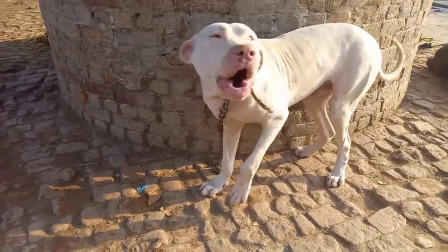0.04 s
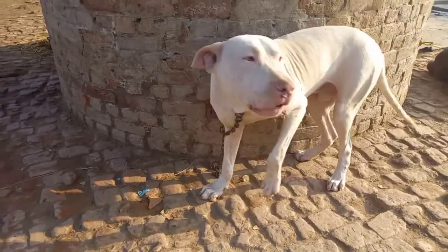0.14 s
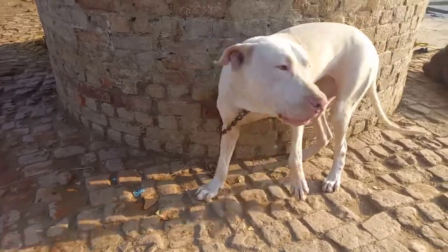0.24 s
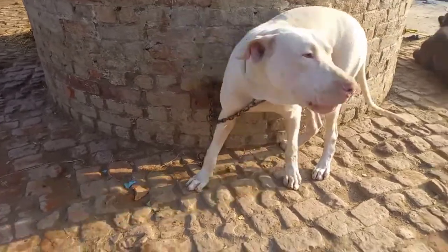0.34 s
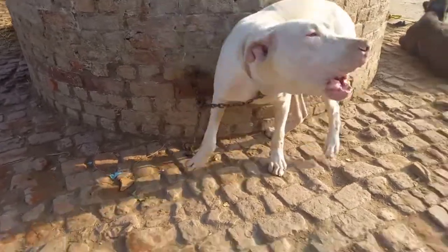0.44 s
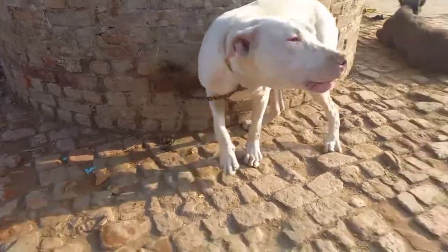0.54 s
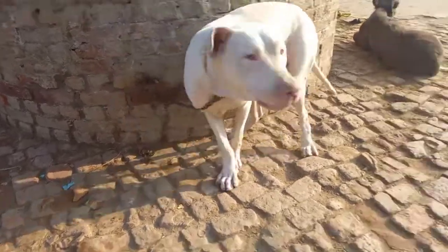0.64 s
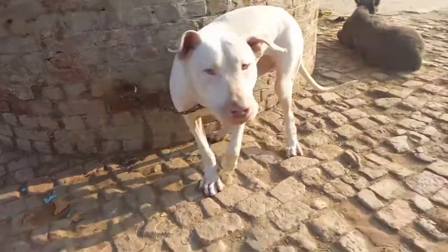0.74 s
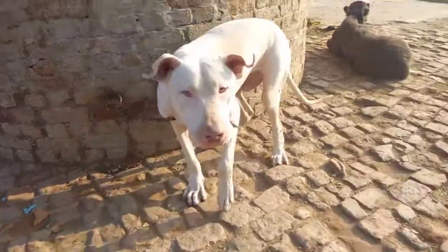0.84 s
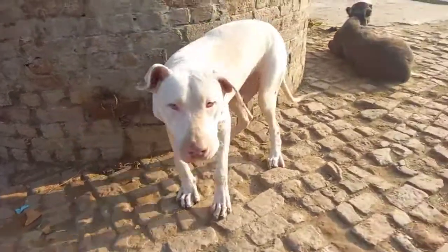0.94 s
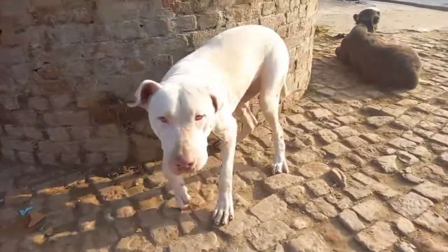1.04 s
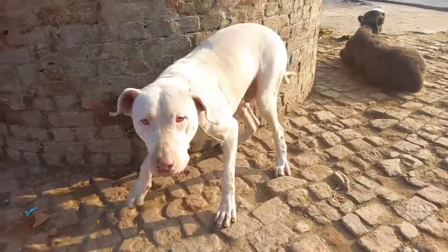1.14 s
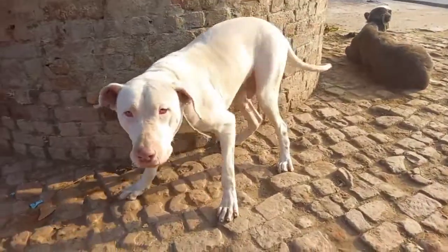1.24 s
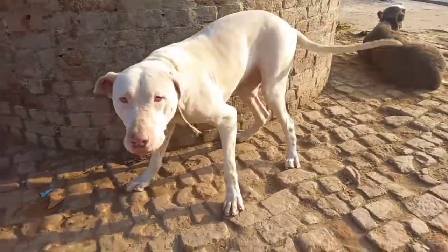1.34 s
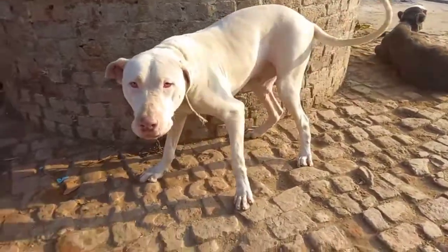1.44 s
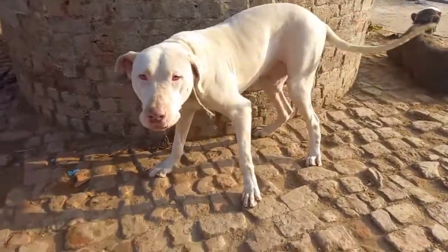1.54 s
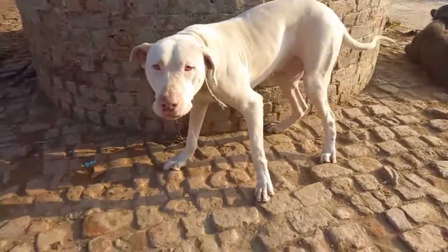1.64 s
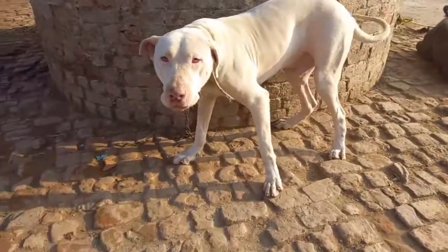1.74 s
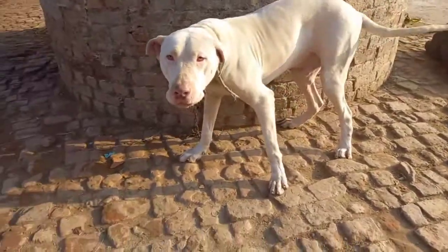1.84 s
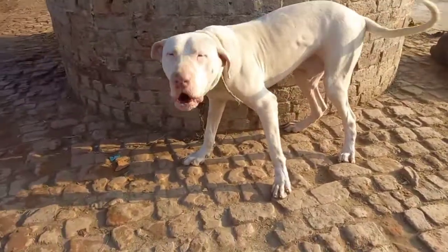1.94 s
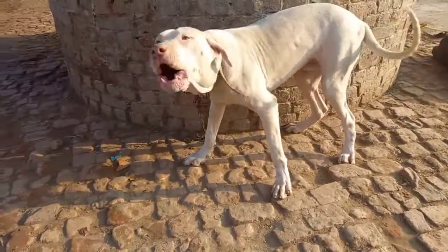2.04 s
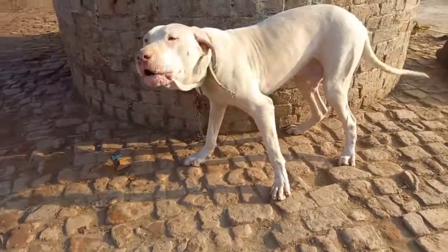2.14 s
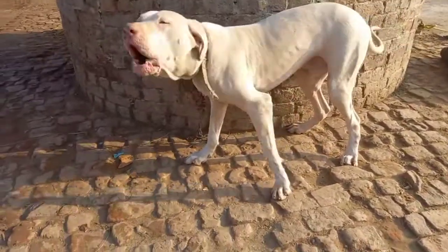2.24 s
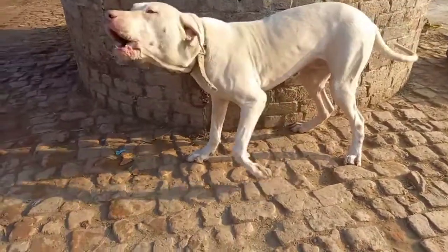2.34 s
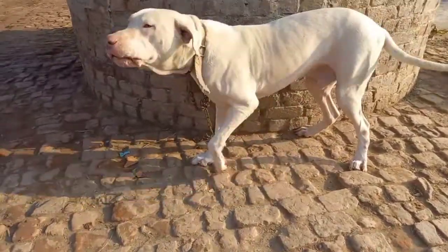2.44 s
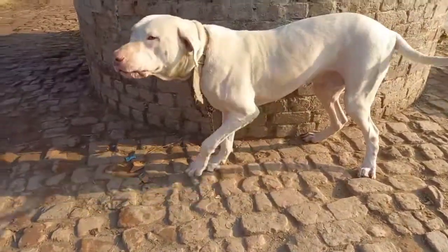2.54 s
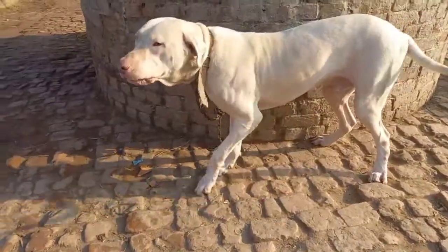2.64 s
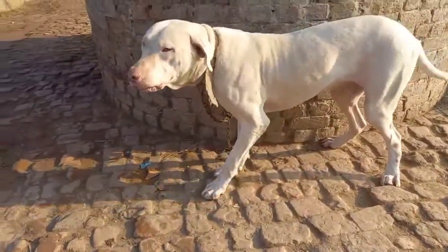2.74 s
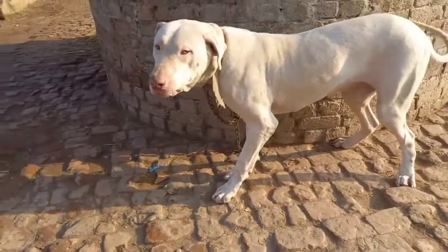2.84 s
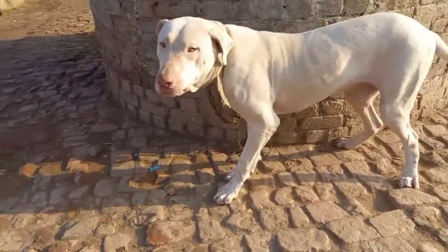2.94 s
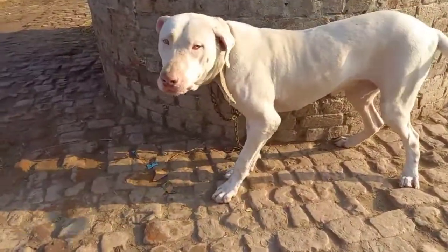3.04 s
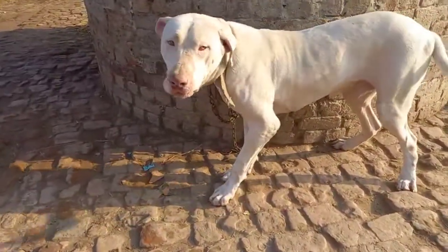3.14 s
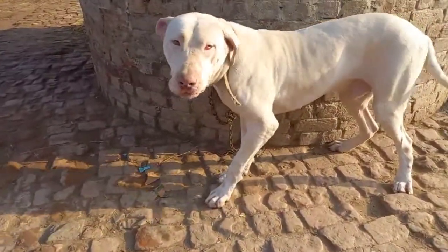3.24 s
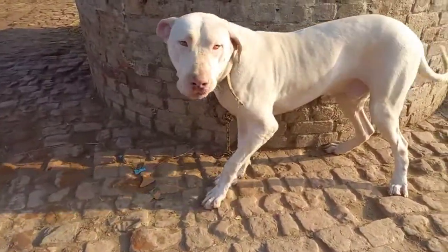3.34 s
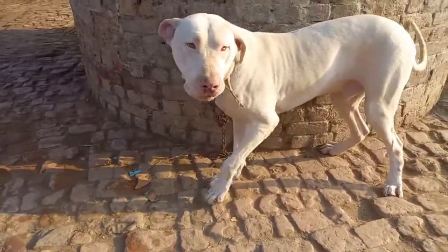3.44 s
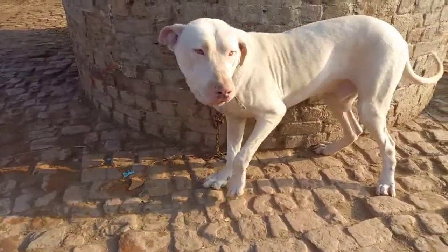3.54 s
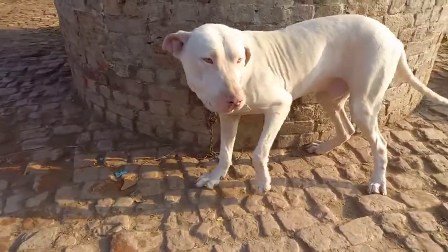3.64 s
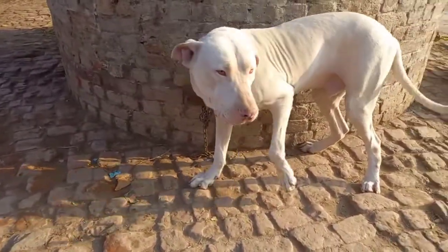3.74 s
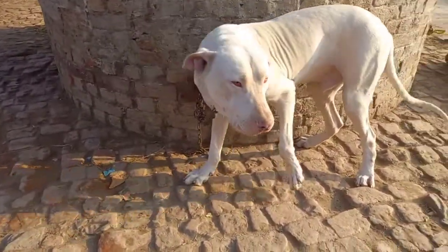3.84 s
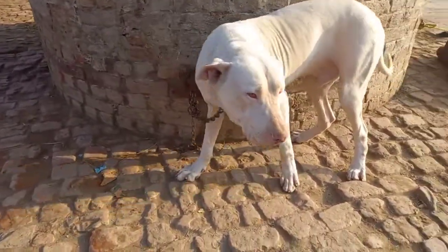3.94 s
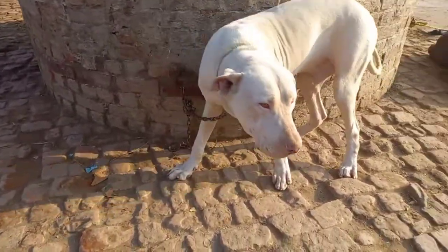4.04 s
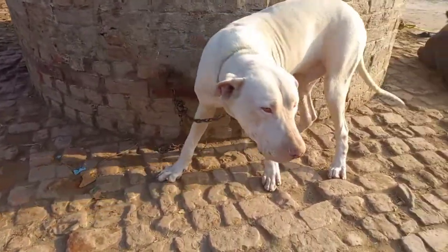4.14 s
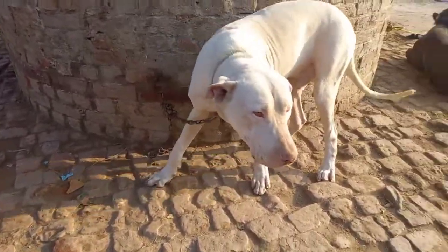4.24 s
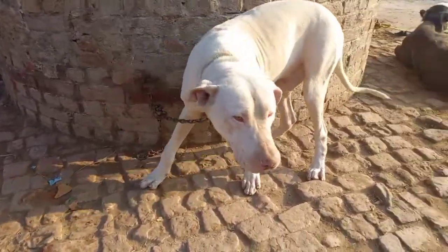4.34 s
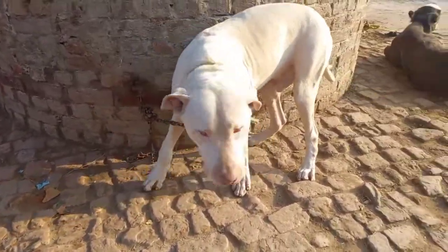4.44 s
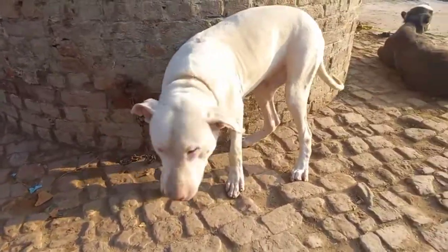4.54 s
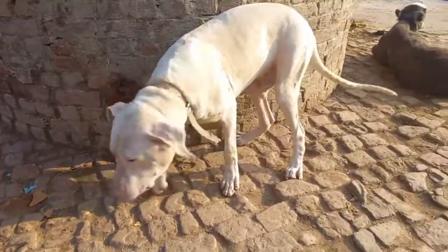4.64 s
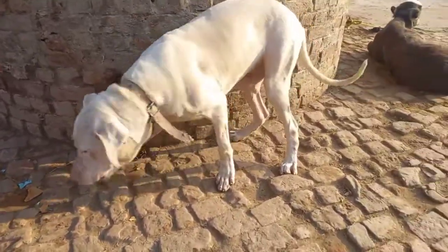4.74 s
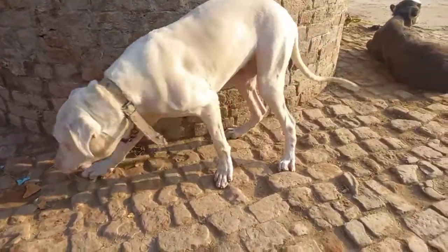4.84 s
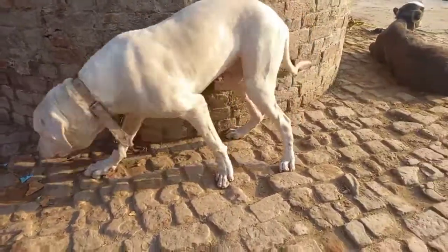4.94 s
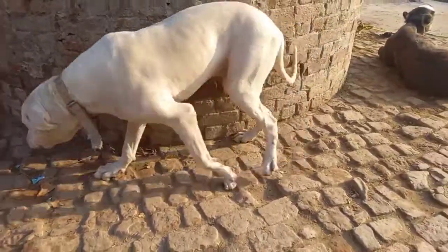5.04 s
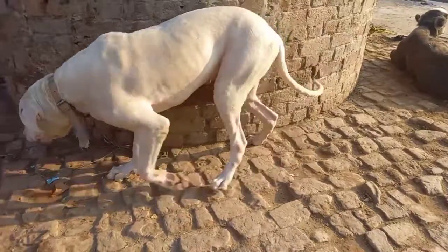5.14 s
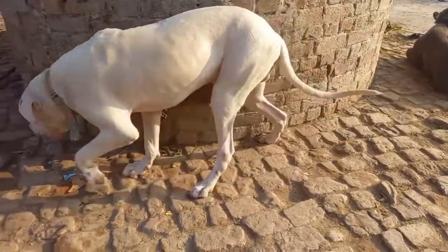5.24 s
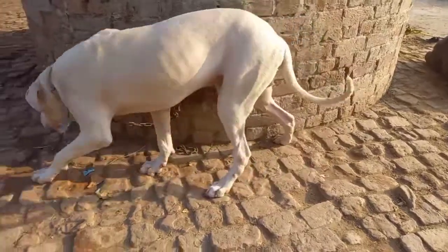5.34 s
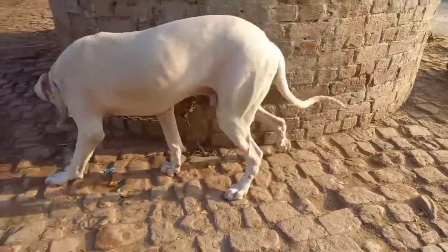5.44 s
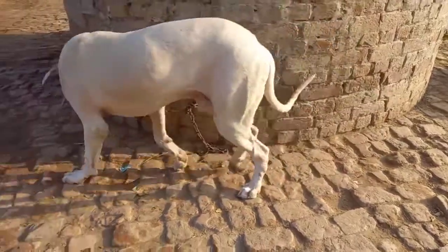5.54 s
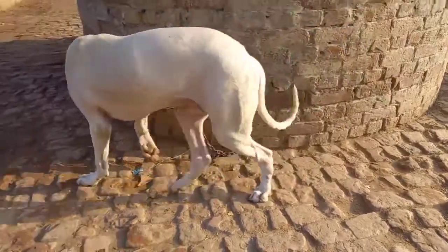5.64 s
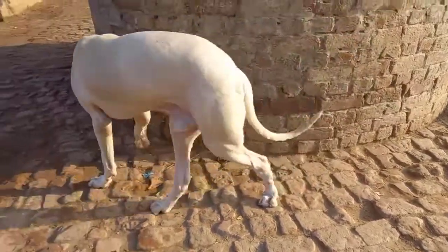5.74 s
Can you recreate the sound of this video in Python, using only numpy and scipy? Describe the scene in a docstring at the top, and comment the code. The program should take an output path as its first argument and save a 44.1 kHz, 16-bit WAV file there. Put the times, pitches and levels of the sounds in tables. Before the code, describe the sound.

A big chained dog gives two hoarse double barks in a brick yard, then grumbles into a long, low, throbbing growl with chain clinks.

```python
"""A brick yard, close to a big chained dog: two hoarse double barks, each bark one gesture of push, pitch and jaw.
Noisy vocal folds ring the throat, and a noise tail from the walls answers. Paws pat and scuff the paving.
A fluttering grumble leads into a growl: bursts of slaps as slow throbs, brief snarls, then a steady low pulse train.
The chain is fine noise and ringing metal; behind lie a faint hum and a low rumble that swells mostly with the barks."""
import sys
import numpy as np
from scipy import signal
from scipy.fft import rfft, irfft, next_fast_len
from scipy.io import wavfile
from scipy.ndimage import uniform_filter1d, map_coordinates

SR = 44100
rng = np.random.default_rng(int(sys.argv[2]) if len(sys.argv) > 2 else 0)


def unload_audio(sound):
    """Save the sound as a 16-bit wav file, at the path given as the first command line argument."""
    columns = np.transpose(np.atleast_2d(sound))
    # keep every value between -1 and 1, then stretch to whole-number steps
    steps = np.round(np.clip(columns, -1, 1) * 32767)
    wavfile.write(sys.argv[1], SR, steps.astype(np.int16))


N = 255780
T = np.arange(N) / SR  # seconds


def amp(db):
    """Decibels to gain."""
    return 10 ** (np.asarray(db) / 20)


def unit(x):
    """Scale to rms 1."""
    return x / np.sqrt(np.mean(x ** 2) + 1e-20)


def steady(x, size):
    """Scale to a running rms of 1, averaged twice over size samples."""
    power = uniform_filter1d(uniform_filter1d(x * x, size), size)
    return x / np.sqrt(np.abs(power) + 1e-12)


def along(points, hz):
    """Read (freq_hz, value) points on a log frequency axis."""
    f, v = np.transpose(points)
    return np.interp(np.log(hz + 1), np.log(f + 1), v)


def curves(rows):
    """One value per sample for each column after the time."""
    s, *cols = np.transpose(rows)
    return [np.interp(T, s, c) for c in cols]


def wobble(rate):
    """A smooth random curve, rate knots a second."""
    return map_coordinates(rng.standard_normal(N // 8), [T * rate + 2], mode="wrap")


def swell(start, length, rise, fall):
    """Attack, hold and release, from 0 to 1 and back; all in seconds."""
    return np.clip((T - start) / rise, 0, 1) * np.clip((start + length - T) / fall, 0, 1)


def filtered(x, gain):
    """x times a gain that depends on frequency."""
    m = next_fast_len(N + SR // 2)
    return irfft(rfft(x, m) * gain(np.fft.rfftfreq(m, 1 / SR)), m)[..., :N]


def band(x, lo_hz, hi_hz, order=12):
    """Band-pass, steeper with higher order."""
    def gain(f):
        return 1 / np.sqrt((1 + (lo_hz / (f + 1)) ** order) * (1 + (f / hi_hz) ** order))

    return filtered(x, gain)


def coloured(x, spectrum):
    """x shaped by (freq_hz, level_db) points."""
    return filtered(x, lambda f: amp(along(spectrum, f)))


def resonant(x, centre_hz, width_hz, boost):
    """Add one narrow ringing resonance to x."""
    return filtered(x, lambda f: 1 + boost * 1j * f * width_hz / (centre_hz ** 2 - f * f + 1j * f * width_hz))


def ring_of(spectrum, size=4096):
    """Causal impulse response with this spectrum, peak 1."""
    cepstrum = irfft(np.log(amp(along(spectrum, np.fft.rfftfreq(size, 1 / SR)))))
    # folding the cepstrum forward in time gives minimum phase
    cepstrum[1:size // 2] *= 2
    cepstrum[size // 2 + 1:] = 0
    h = irfft(np.exp(rfft(cepstrum)))
    return h / np.abs(h).max()


def through(x, h):
    """x convolved with an impulse response."""
    return signal.fftconvolve(x, h)[:N]


def noise(spectrum, width):
    """Stereo noise of rms 1; width is side over mid."""
    mid, side = coloured(rng.standard_normal((2, N)), spectrum)
    return unit(np.array([mid + width * side, mid - width * side]))


def patchy(x, depth_db):
    """Turbulence: brief, narrow patches of the spectrum swell and fade."""
    z = signal.stft(x, nperseg=512)[2]
    field = rng.standard_normal(z.shape[1:])
    field = uniform_filter1d(field, size=4, axis=0)
    field = uniform_filter1d(field, size=7, axis=1)
    return signal.istft(z * amp(depth_db * unit(field)), nperseg=512)[1][:, :N]


def add(track, s, sound):
    """Mix a sound in at time s."""
    room = track[..., max(round(s * SR), 0):]
    room[..., :sound.shape[-1]] += sound[..., :room.shape[-1]]


# where the head is, by arrival at the two ears: (time_s, left_lag_samples)
HEAD_BEARING = [(0, -3), (.45, -15.5), (1.95, 3), (2.3, 9.5), (4.2, -11.5), (4.8, 12), (5.8, 5.5)]


def placed(x, share=1):
    """The nearer ear hears the dog a little earlier; share scales the lag."""
    lag = share * curves(HEAD_BEARING)[0] / 2
    return np.array([map_coordinates(x, [np.arange(N) + side * lag], mode="nearest") for side in (-1, 1)])


# distant hum, density per Hz: (freq_hz, level_db)
HUM_SPECTRUM = [(88, -67.5), (150, -42), (230, -31.5), (284, -13.5), (370, -4), (409, -9), (525, -15.5),
                (588, -29.5), (959, -56.5), (3000, -52.5), (3900, -87), (6600, -120)]
HUM_DB, HUM_WAVER_DB = -69, 5  # middle level, size of its waver
# low rumble, density per Hz: (freq_hz, level_db)
RUMBLE_SPECTRUM = [(20, -31), (45, -10), (75, -1.5), (150, -2.5), (250, 1.5), (500, -35.5), (1000, -67)]
# low rumble that swells, mostly with the barks, and dies away: (start_s, length_s, level_db)
RUMBLE_SWELLS = [(0, .8, -46), (1.478, 0.36, -73), (1.908, .68, -51.5)]
RUMBLE_RISE_S, RUMBLE_FALL_S, RUMBLE_FLOOR_DB = 0.043, .18, -86


def outdoors():
    """A faint distant hum that wavers, and a low rumble that swells, mostly with the barks, and dies away."""
    hum = amp(HUM_DB + HUM_WAVER_DB * wobble(15)) * noise(HUM_SPECTRUM, width=.25)
    swells = sum(amp(db) * swell(s, length, RUMBLE_RISE_S, RUMBLE_FALL_S) ** 2 for s, length, db in RUMBLE_SWELLS)
    return hum + (amp(RUMBLE_FLOOR_DB) + swells) * noise(RUMBLE_SPECTRUM, width=.25)


# how long the brick yard rings: (freq_hz, t60_s)
YARD_DECAY = [(100, 0.92), (400, 0.58), (1500, 0.49), (4500, 0.45), (12000, 0.53)]
ECHO_DB, NEAR_ECHO_DB = -18, -16.5  # the yard's answer to the barks; to the growl, paws and chain


def yard(x, width=0.1, delay=0.015):
    """Brick walls and paving send back a tail that builds over delay seconds and lasts longest in the bass."""
    hz, t, z = signal.stft(rng.standard_normal((2, SR)), SR, nperseg=256)
    decay = amp(-60 * t / along(YARD_DECAY, hz)[:, None])
    build = 1 - np.exp(-t / delay)
    mid, side = signal.istft(z * decay * build, SR, nperseg=256)[1]
    ears = (mid + width * side, mid - width * side)
    return np.array([through(x, h / np.linalg.norm(h)) for h in ears])


# paws and chain knocking on the bricks: (start_s, peak_level_db, grit_db relative to the knock)
KNOCKS = [(0.809, -27, -13), (0.824, -39, -13), (1.383, -43.5, -17.5), (1.401, -45.5, -6.5),
          (2.7, -51.5, 0.5), (3.764, -45.5, -34), (3.87, -36, -5.5), (3.923, -37.5, -14), (4.372, -45, -13),
          (4.392, -29, -14.5)]
GRIT_T60_S = 0.1


def steps(thud_t60=0.025):
    """Each contact is a dull, short pat of noise with a longer scratch of grit."""
    thud, grit, t = np.zeros(N), np.zeros(N), np.arange(SR // 4) / SR
    for s, db, grit_db in KNOCKS:
        # the offsets turn a peak level into a noise level
        add(thud, s, amp(db - 11.5 - 60 * t / thud_t60))
        add(grit, s, amp(db + grit_db - 10.5 - 60 * t / GRIT_T60_S))
    pat = noise([(40, -3.5), (90, -14.5), (450, -2.5), (800, -4.5), (1600, -23.5), (4000, -76.5)], width=0.17)
    scratch = noise([(400, -16.5), (1200, 3.0), (1900, -4.0), (2800, -11.0), (4600, -12), (7000, -37.5),
                     (15000, -33.5)], width=0.745)
    return thud * pat + grit * scratch


SCUFF_START_S, SCUFF_S, SCUFF_DB = 4.4, .17, -60.5


def scuff(grain_db=3, rise_s=0.065, fall_s=0.13):
    """A pad drags over gritty brick: narrow bands of noise with a grainy level."""
    grit = noise([(700, -41), (1350, -3.0), (1550, -30), (1800, -6), (2400, -26.0), (6000, -28)], width=.4)
    grains = unit(grit * amp(grain_db * wobble(240)))
    return swell(SCUFF_START_S, SCUFF_S, rise_s, fall_s) * amp(SCUFF_DB) * grains


def metal(modes, t):
    """Decaying modes, at new strengths for each strike and each ear."""
    out = 0
    for hz, db, t60 in modes:
        level_db = db + rng.normal(0, 0.76, (2, 1))
        mode_hz = hz * (1 + rng.normal(0, .003))
        phase = rng.normal(0, 0.53, (2, 1))
        out = out + amp(level_db - 60 * t / t60) * np.sin(2 * np.pi * mode_hz * t + phase)
    return out


# chain links striking: (start_s, peak_level_db, ring_share 0-1)
LINK_STRIKES = [(.8884, -46.5, .1), (0.9594, -48, .1), (1.415, -57, 0.2), (3.48, -47.5, .1),
                (4.5919, -42.5, .1), (4.8294, -33.5, .15), (5.3805, -41, .1), (5.5927, -30.5, 0.4),
                (5.6327, -38, .2), (5.6782, -38, .3), (5.7743, -33.5, 1)]
# modes of one link: (freq_hz, level_db, t60_s)
LINK_MODES = [(4112, -9.5, 0.095), (7400, -15.5, 0.039), (11600, 6, 0.073), (12150, -2.5, 0.084),
              (15700, -7.5, .08)]
# the collar ring swinging, levels ahead of rub_db: (start_s, level_db)
COLLAR_CHIMES = [(1.67, -89), (4.074, -63), (4.509, -67), (4.71, -85), (4.838, -55.5)]
# modes of the collar ring: (freq_hz, level_db, t60_s)
COLLAR_MODES = [(2582, -2, 1), (2708, -4, .5), (6685, -10.5, 0.199), (7400, -11.5, 0.81), (11500, -13, .35),
                (12350, -12.5, .35)]
# links rattling over brick, density per Hz: (freq_hz, level_db)
RATTLE_SPECTRUM = [(700, -14), (1400, -0.5), (2600, 1), (3200, -5), (5000, 3.5), (9000, -2.5), (12000, 4.5),
                   (15500, -7.5)]
# the chain slides over the bricks: (start_s, length_s, level_db)
CHAIN_SLIDES = [(0.826, 0.19, -73), (1.36, 0.099, -81.5), (3.431, 0.19, -76), (4.31, .16, -68),
                (4.769, .27, -67), (5.161, .12, -67), (5.317, .12, -68), (5.501, .4, -63)]
SLIDE_RISE_S, SLIDE_FALL_S = 0.065, .05
# between slides the chain rustles more once the dog walks
WALK_START_S, WALK_RISE_S, WALK_DB, STILL_DB = 3.9, 0.41, -75.5, -98


def chain(tick_t60=0.04, grain_db=3.0, rub_db=4):
    """Links slide over brick in a fine rattle, some strike and ring, and the collar ring chimes unevenly as it rubs."""
    out, t = np.zeros((2, N)), np.arange(SR // 2) / SR
    for s, db, ring in LINK_STRIKES:
        tick = rng.standard_normal((2, len(t))) * amp(-60 * t / tick_t60)
        add(out, s, amp(db - 8) * (ring * metal(LINK_MODES, t) + tick))
    for s, db in COLLAR_CHIMES:
        rub = 1 + .8 * wobble(170)[:len(t)]
        soft_start = 1 - np.exp(-t / 0.0039)
        add(out, s, amp(db - rub_db) * metal(COLLAR_MODES, t) * rub * soft_start)
    pull = amp(STILL_DB) + amp(WALK_DB) * np.clip((T - WALK_START_S) / WALK_RISE_S, 0, 1)
    pull = pull + sum(amp(db) * swell(s, length, SLIDE_RISE_S, SLIDE_FALL_S) for s, length, db in CHAIN_SLIDES)
    rattle = unit(patchy(noise(RATTLE_SPECTRUM, width=0.53), depth_db=-0.5) * amp(grain_db * wobble(350)))
    return band(out, 2200, 17000, order=6) + pull * rattle


# hiss under the growl, density per Hz: (freq_hz, level_db)
TEETH_SPECTRUM = [(2500, -3.5), (3300, -8), (3800, 6.5), (4400, -12), (5200, 0.5), (6500, -14),
                  (12000, -14.5)]


def teeth(db=-73, grain_db=5.5):
    """A soft, grainy hiss joins the growl once it is under way."""
    joining = np.interp(T, [4.9, 5.0], [0, 1])
    return joining * amp(db + grain_db * wobble(120)) * noise(TEETH_SPECTRUM, width=.6)


# effort of the soft lead-in to the growl: (time_s, level_db)
GRUMBLE_EFFORT = [(3.87, -48), (3.99, -56.5), (4.23, -63), (4.42, -54), (4.85, -52.5), (5.02, -48.5)]
# colour of the grumble, density per Hz: (freq_hz, level_db)
GRUMBLE_SPECTRUM = [(26, -55), (45, -9), (81, -2), (195, -10), (292, 1), (355, 2.5), (398, 0.5), (517, 4),
                    (776, -21), (1190, -36), (1350, -26), (1510, -23.5), (2200, -32), (2860, -24.5),
                    (4840, -120)]


def grumble(flutter_hz=21, depth=0.22, rise_s=0.013):
    """The throat flutters softly before the growl takes hold, and goes on underneath it."""
    flutter = 1 + depth * np.sin(2 * np.pi * flutter_hz * T + wobble(2.2))
    onset = np.clip(1 + (T - GRUMBLE_EFFORT[0][0]) / rise_s, 0, 1)
    breath = steady(noise(GRUMBLE_SPECTRUM, width=0.085)[0], size=2000)
    return onset * amp(curves(GRUMBLE_EFFORT)[0]) * flutter * breath


def muffled(x):
    """The closed muzzle lets hardly any treble out."""
    return band(x, 20, 2500)


# first throb, settled spacing, extra spacing at first, time in which that is taken up
THROB_START_S, THROB_GAP_S, THROB_SLACK_S, THROB_SETTLE_S = 4.67, .0447, .0053, .11
GROWL_START_S, GROWL_RISE_S, GROWL_DB = 5.43, 0.11, -28.5  # the steady growl


def throb_times():
    """The throbs quicken a little, then keep their pace until the steady growl takes over."""
    times = [THROB_START_S]
    while times[-1] < GROWL_START_S:
        slack = THROB_SLACK_S * np.exp(-(times[-1] - THROB_START_S) / THROB_SETTLE_S)
        times.append(times[-1] + THROB_GAP_S + slack)
    return times


# effort of the throbs: (time_s, peak_level_db)
THROB_PEAKS = [(4.67, -36), (4.87, -33.5), (4.97, -22), (5.45, -22.5)]
# the lips lift into a snarl: (start_s, length_s, level_db relative to the throbs)
SNARL_LIPS = [(4.612, 0.19, -7.5), (5.162, 0.151, -4.5), (5.277, 0.13, -4)]
LIP_RISE_S, LIP_FALL_S, LIPS_SHUT_DB = 0.022, 0.061, -23.5  # lifting, dropping; what leaks out when shut
# ring of the chest behind a closed mouth: (freq_hz, level_db)
CHEST_RING = [(25, -41.5), (55, -7), (85, -2), (150, 6), (220, -1.5), (300, -9), (470, -22.5), (650, -23),
              (900, -63), (1250, -56.5), (1700, -31), (2200, -70), (4500, -14.5), (9000, -85)]
# ring of the mouth with the lips raised: (freq_hz, level_db)
SNARL_RING = [(200, -32), (430, -17), (560, 8.5), (760, -5.5), (920, -24), (1190, -13.5), (1400, -32),
              (1630, -6), (2050, -38.5), (2900, -50), (3210, -22), (3600, -59), (6000, -72), (12000, -70.5)]


def throbs(slap_gap=.0142, fade_db=5, weak_fade_db=18, uneven_db=0.9, surge_db=2.5, count=3):
    """The slack folds flap in short bursts of fading slaps; raised lips let the mouth resonances out."""
    closed, lips = np.zeros(N), np.zeros(N)
    chest, snarl = ring_of(CHEST_RING), ring_of(SNARL_RING)
    t = np.arange(SR // 30) / SR
    for s in throb_times():
        db = np.interp(s, *np.transpose(THROB_PEAKS))
        fade = np.interp(db, [-30, -24], [weak_fade_db, fade_db])  # a weak throb fades faster
        start = s + rng.normal(0, 0.00061)
        db = db + rng.normal(0, surge_db)
        for k in range(count):
            at = start + k * slap_gap + rng.normal(0, 0.0011)
            level_db = db - fade * k * k / 2 + rng.normal(0, uneven_db)
            # one click, then a little fading noise
            spray = .05 * rng.standard_normal(len(t)) * amp(-60 * t / .05)
            spray[0] = 1
            add(closed, at, amp(level_db) * chest)
            add(lips, at, amp(level_db) * spray)
    curls = sum(amp(db) * swell(s, length, LIP_RISE_S, LIP_FALL_S) for s, length, db in SNARL_LIPS)
    opening = amp(LIPS_SHUT_DB) + curls
    return muffled(closed * np.clip(1 - .5 * opening, 0, 1)) + through(opening * lips, snarl)


# pulse rate of the steady growl: (time_s, pitch_hz)
STEADY_PITCH = [(5.444, 73.14), (5.495, 75.57), (5.525, 90.9), (5.62, 89.24), (5.695, 96.7), (5.77, 76.4)]


def growl(size_db=2.0, rasp_db=-13):
    """The flapping locks into a slightly uneven pulse train through the closed mouth, with a rasp on each pulse."""
    cycles = np.cumsum(curves(STEADY_PITCH)[0] * (1 + .035 * wobble(90))) / SR
    pulses = np.diff(np.floor(cycles), prepend=0) * amp(size_db * wobble(90))
    hum = steady(muffled(through(pulses, ring_of(CHEST_RING))), size=1800)
    bursts = rng.standard_normal(N) * np.exp(-2 * (cycles % 1))
    rasp = coloured(bursts, [(150, -11.5), (330, 4.0), (650, -11), (950, -30.0), (1750, -31.0), (2300, -38.0),
                             (5000, -59.0), (9000, -53.5)])
    level = amp(GROWL_DB) * np.clip((T - GROWL_START_S) / GROWL_RISE_S, 0, 1)
    return level * (hum + amp(rasp_db) * unit(rasp))


# barks; jaw ring, wide-mouth ring and hiss are relative to the voice:
# (crest_s, before_crest_s, after_crest_s, level_db, crest_pitch_hz, pitch_sag_s, roughness 0-1,
#  jaw_ring_db, wide_mouth_ring_db, hiss_db)
BARK_GESTURES = [(0.013, 0.24, .11, -12, 398.3, .065, .35, 1.5, -15.5, -21),
                 (0.419, .1, 0.13, -10.5, 400, .1, .35, -5.5, -18, -28),
                 (1.923, 0.037, 0.16, -11, 451.1, .055, .3, -2, -9, -25),
                 (2.261, .052, 0.16, -10.5, 418.4, .1, 0.4, -8, -13.5, -32.5)]
ONSET_POWER, RELEASE_S = 1.4, 0.075  # curve of a bark's rise and fade; length of its fade
REST_HZ = 353  # the pitch starts from here and sags back towards it
CLEARING_PER_S = 6.5  # the voice is roughest at the onset and clears at this rate
JAW_LAG_S, JAW_OPEN_S = .035, 0.071  # the jaw is lowest just after the crest, and stays open about this long
JAW_SHUT_DB, HISS_SHUT_DB = 7, 4  # what a shut jaw takes off its ring and off the hiss
NARROWING_DB_PER_S, NARROWED_DB = 172.5, 17  # lips narrowing; the most this takes off the upper ring


def bark_controls():
    """Push and pitch rise to a crest, the jaw drops and shuts, the lips narrow, the pitch sags."""
    rows = np.array(BARK_GESTURES)
    nearest = np.argmin(np.abs(T[:, None] - rows[:, 0]), axis=1)
    crest, before, after, db, crest_hz, sag_s, rough, jaw_db, wide_db, hiss_db = rows[nearest].T
    t = T - crest
    level = amp(db) * swell(crest - before, before + after, before, RELEASE_S) ** ONSET_POWER
    bend_s = np.where(t < 0, .7 * before, sag_s)
    pitch = REST_HZ + (crest_hz - REST_HZ) * np.exp(-(t / bend_s) ** 2)
    shut = 1 - np.exp(-((t - JAW_LAG_S) / JAW_OPEN_S) ** 2)
    narrowed_db = np.clip(NARROWING_DB_PER_S * t, -3, NARROWED_DB)
    return (level, pitch, rough * np.exp(-CLEARING_PER_S * t),
            jaw_db - JAW_SHUT_DB * shut, wide_db - narrowed_db, hiss_db - HISS_SHUT_DB * shut)


# ring of the throat, density per Hz: (freq_hz, level_db)
THROAT_RING = [(150, -40.5), (240, -24.5), (305, -6.5), (420, -6.5), (500, -12.5), (580, -16), (750, -12),
               (930, -24.5), (1180, -24), (1380, -23.5), (1580, -34), (1750, -27), (2120, -25.5),
               (2700, -44.5)]
# air rushing past the teeth, density per Hz: (freq_hz, level_db)
BREATH_HISS = [(2200, -21.5), (2750, -1.5), (3400, -0.5), (3900, -2), (4650, 0), (5600, -5.5), (7400, -8),
               (8900, -19.5), (10500, -14), (12200, -14), (14000, -16), (15800, -21)]
BOOM_HZ, BOOM_WIDTH_HZ = 421.2, 18  # the one note on which the barks boom


def barks(half=0.3, push_db=-33, flutter_db=2.62, wander=.015, count=8):
    """Unsteady vocal folds and puffs of turbulent air ring the throat; the opening mouth adds the upper resonances."""
    level, pitch, rough, jaw_db, wide_db, hiss_db = bark_controls()
    rough = np.clip(rough, .05, .6)
    pitch = pitch * (1 + wander * wobble(50))
    phase = 2 * np.pi * np.cumsum(pitch * (1 + (.01 + .045 * rough) * wobble(260))) / SR
    harmonics = sum(np.cos(k * phase + k * k) for k in range(1, count + 1))
    # alternate cycles differ in strength, which puts weak lines between the harmonics
    folds = harmonics * (1 + half * wobble(30) * np.cos(phase / 2))
    gate = 1 + .6 * np.cos(phase)  # air escapes once per cycle
    shimmer = amp(3.2 * wobble(300))
    throat = ring_of(THROAT_RING)
    folds = through(folds * shimmer, throat)
    puffs = through(rng.standard_normal(N) * gate, throat)

    def register(lo_hz, hi_hz, share):
        """One band of the voice; share is the part of its power that is turbulent air."""
        tone = steady(band(folds, lo_hz, hi_hz), size=900)
        breath = unit(band(puffs, lo_hz, hi_hz))
        return np.sqrt(1 - share) * tone + np.sqrt(share) * breath

    low = resonant(register(250, 600, .08 + 1.2 * rough), BOOM_HZ, BOOM_WIDTH_HZ, boost=2.4)
    low = steady(low, size=500) * amp(flutter_db * wobble(80))
    jaw = steady(register(620, 1300, .9 * rough), size=500)
    wide = steady(register(1300, 2600, .1 + rough), size=500)
    upper = amp(jaw_db + flutter_db * wobble(80)) * jaw + amp(wide_db) * wide
    rasp = gate * amp(2.5 * wobble(230))
    air = patchy(resonant(noise(BREATH_HISS, width=.75), 4650, 350, boost=1.3), depth_db=4.2)
    hiss = amp(hiss_db) * unit(air * rasp)
    # low push of air leaving the open jaw
    push = amp(push_db + .5 * jaw_db) * band(noise(RUMBLE_SPECTRUM, width=.25), 55, 600, order=6)
    return level * (placed(low, share=1.0) + placed(upper, share=0.54) + hiss + push)


def scene():
    """The dog is close; its barks carry into the yard, which booms on one note."""
    voice = barks()
    low = placed(grumble() + throbs() + growl())
    small = steps() + scuff() + chain()
    echo = amp(ECHO_DB) * yard(resonant(voice[0], BOOM_HZ, BOOM_WIDTH_HZ, boost=.5))
    near_echo = amp(NEAR_ECHO_DB) * yard(low[0] + small[0])
    return voice + low + teeth() + small + echo + near_echo + outdoors()


LOW_CUT_HZ = 21  # the microphone loses the deepest bass
TOP_HZ = 15900  # nothing is kept from here up


def record(dry):
    """The loudest peaks are rounded off, then the deepest bass is thinned and the top cut sharply."""
    rounded = dry / (1 + np.abs(dry) ** 12) ** (1 / 12)
    return filtered(rounded, lambda hz: (hz < TOP_HZ) * hz / np.hypot(hz, LOW_CUT_HZ))


dry = scene()
out = record(dry)
unload_audio(out)
```